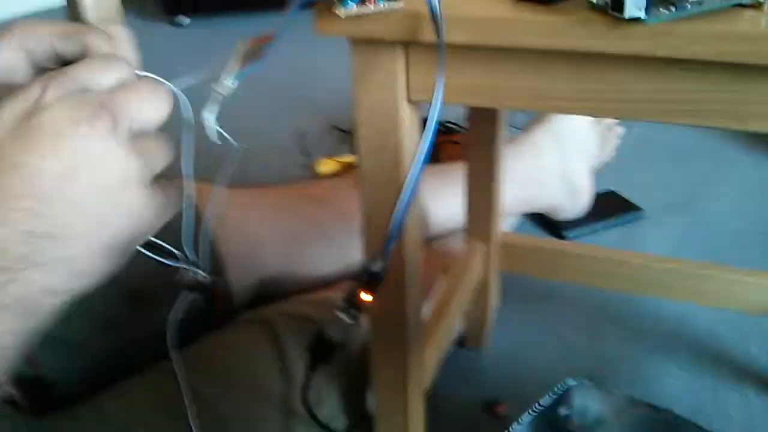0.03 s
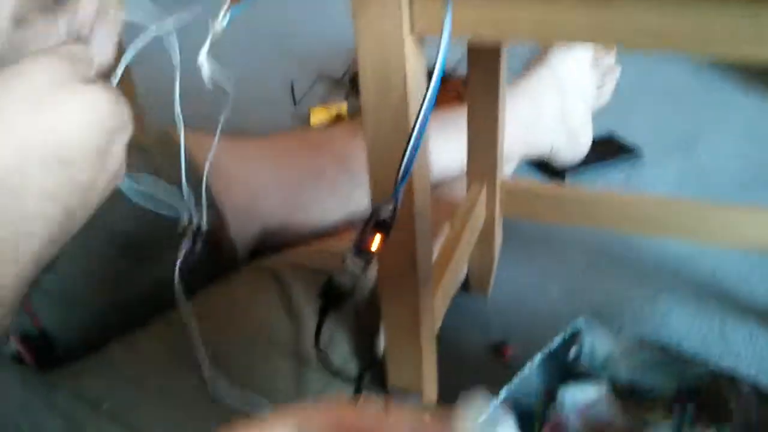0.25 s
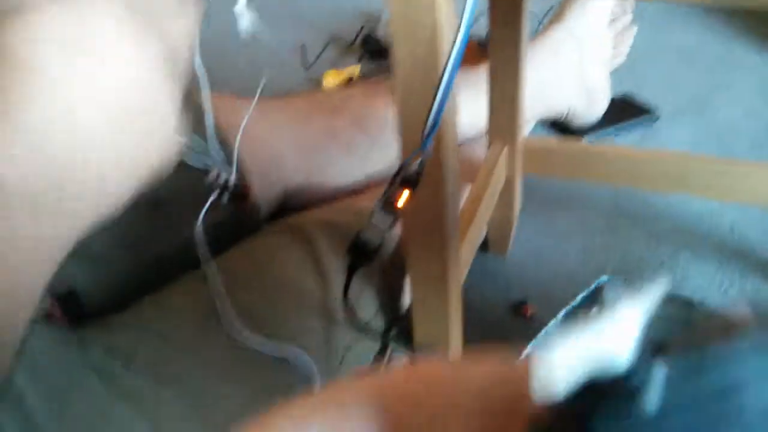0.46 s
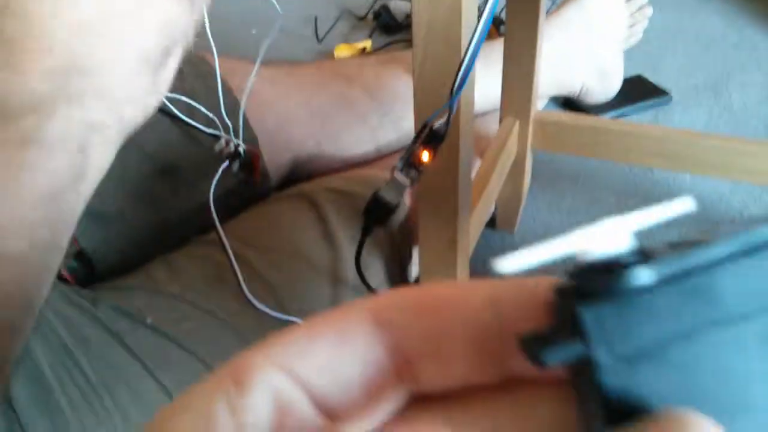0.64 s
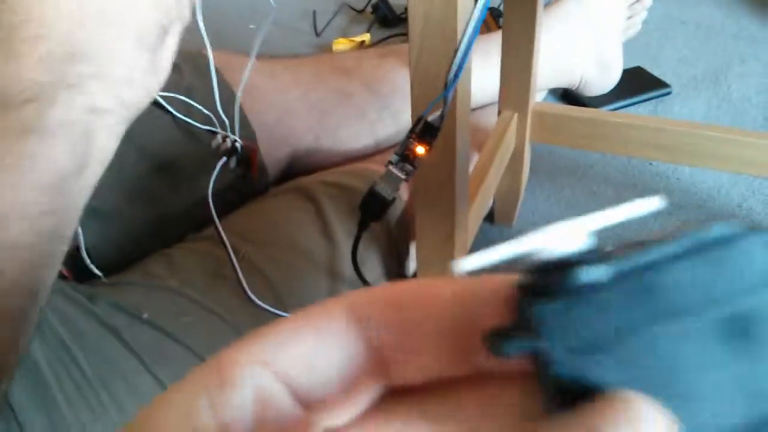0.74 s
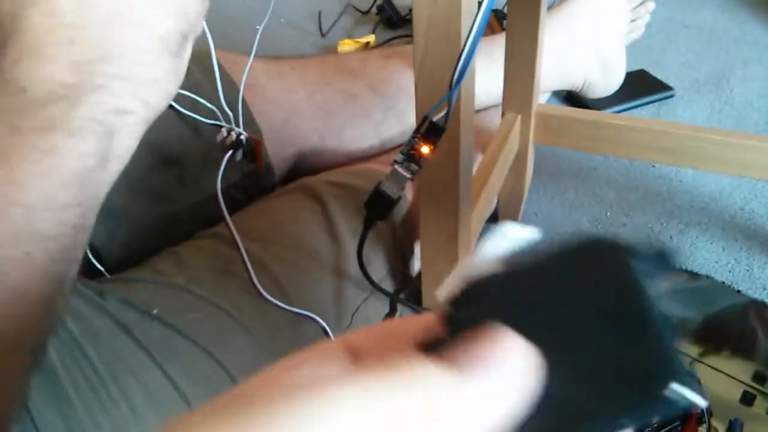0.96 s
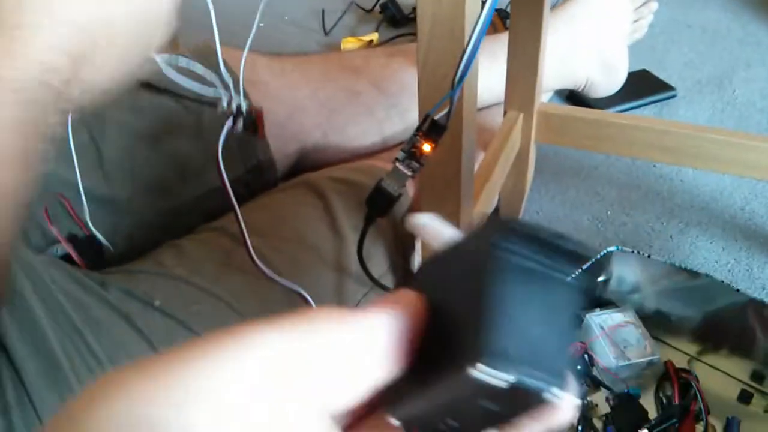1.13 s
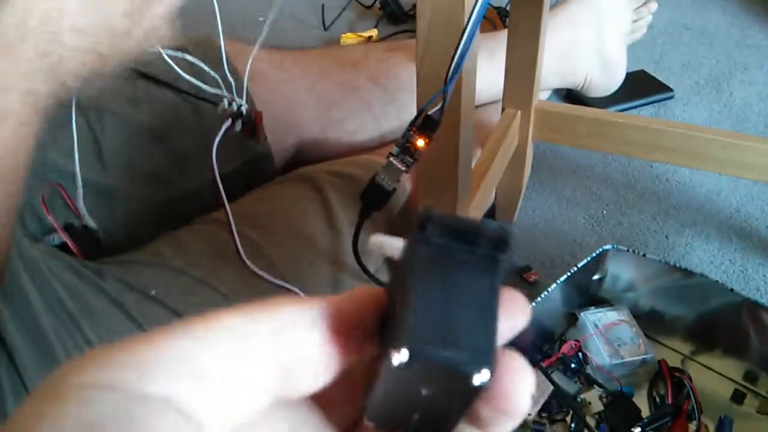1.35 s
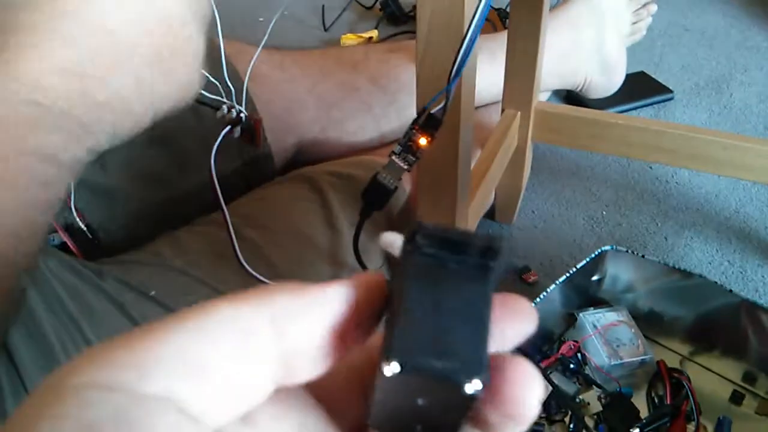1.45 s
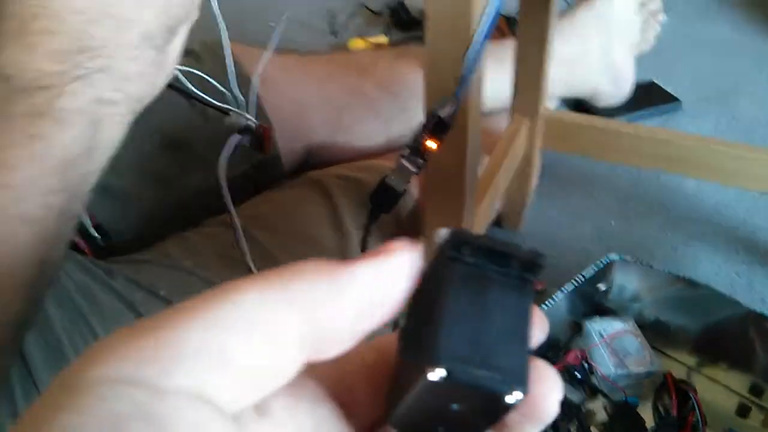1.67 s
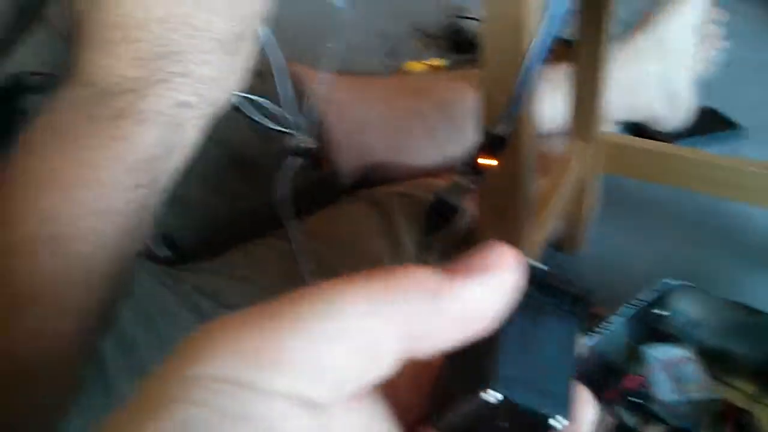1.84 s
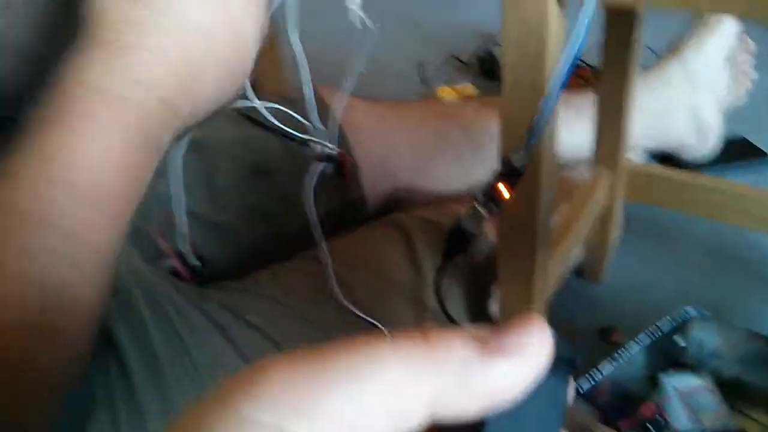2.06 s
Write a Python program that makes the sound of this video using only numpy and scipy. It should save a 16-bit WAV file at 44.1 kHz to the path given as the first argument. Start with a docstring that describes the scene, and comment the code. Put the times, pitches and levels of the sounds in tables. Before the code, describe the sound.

Close up in a quiet indoor room, a tiny geared motor buzzes with a bright, gritty hiss, stops briefly, whirs again and dies away before a crisp click; faint low hum and soft rustling lie beneath.

```python
"""A small hand-held servo whirs in three hissing bursts, close by in a quiet room.
Uneven gear-tooth impacts and sliding friction excite case resonances near 8 kHz, a rasp and a treble hiss.
Damped sine modes with falling chirps make a few sharp clicks; filtered grains make the rustle of handling.
Beneath lie spectrally shaped room noise, wavering mains lines and a low hum that comes and goes."""
import sys
import numpy as np
from scipy import signal
from scipy.fft import rfft, irfft
from scipy.io import wavfile
from scipy.ndimage import map_coordinates

SR = 44100
rng = np.random.default_rng(int(sys.argv[2]) if len(sys.argv) > 2 else 0)


def transcribe(signal):
    """Save signal, clipped to [-1, 1], as a 16-bit WAV file at the path in sys.argv[1]."""
    frames = np.atleast_2d(signal).T
    limited = np.clip(frames, -1, 1)
    pcm = np.round(limited * 32767).astype(np.int16)
    wavfile.write(sys.argv[1], SR, pcm)


N = 92610
TIME = np.arange(N) / SR  # s


def from_db(db):
    """Level as a logarithm: decibels to amplitude gain."""
    return 10 ** (np.asarray(db) / 20)


def rms_one(x):
    """Normalisation of mean power: scale to rms 1."""
    return x / np.sqrt(np.mean(x ** 2) + 1e-20)


def in_time(rows):
    """Linear interpolation of a curve in time; one array per column after the first."""
    times, *columns = np.transpose(rows)
    return [np.interp(TIME, times, column) for column in columns]


def drift(rate_hz):
    """Low-passed noise as a random wander: two equal real poles, rms 1."""
    r = np.exp(-2 * np.pi * rate_hz / SR)
    wander = signal.lfilter([1], [1, -2 * r, r * r], rng.standard_normal(2 * N))
    return rms_one(wander[N:])  # the first half lets the filter settle


def colour(x, spectrum, size=4096):
    """Minimum-phase filtering: a causal body with the given magnitude spectrum; rms 1."""
    hz, db = np.transpose(spectrum)
    grid = np.maximum(np.fft.rfftfreq(size, 1 / SR), 1)
    magnitude = from_db(np.interp(np.log(grid), np.log(hz), db))
    cepstrum = irfft(np.log(magnitude))
    causal = 2 * cepstrum * (np.arange(size) < size // 2)  # folding gives minimum phase
    response = irfft(np.exp(rfft(causal)))
    return rms_one(signal.fftconvolve(x, response)[:N])


def dying(age, t60):
    """Exponential decay of a damped mode: 60 dB in t60 seconds."""
    return from_db(-60 * age / t60)


def resonance(x, hz, width_hz):
    """Heterodyne band-pass: shift to zero, low-pass, shift back, so the centre may move; rms 1."""
    carrier = np.exp(2j * np.pi * np.cumsum(hz * np.ones(N)) / SR)
    r = np.exp(-np.pi * width_hz / SR)
    baseband = signal.lfilter([1], [1, -2 * r, r * r], x / carrier)
    return rms_one((baseband * carrier).real)


def turning(x, modes):
    """Modal superposition with gliding resonances as the servo is turned in the hand; rms 1."""
    # turn from lying flat towards upright: t/s, share/1
    turn_curve = [(.65, 0.1), (1.2, 0.78)]
    turn, = in_time(turn_curve)
    return rms_one(sum(from_db(db) * resonance(x, flat + (upright - flat) * turn, width)
                       for flat, upright, width, db in modes))


def low_hum(rough=0.45, rumble_width_hz=120):
    """Tone plus narrow-band noise: a rough hum that fades, then returns and rises in pitch."""
    # pitch and rms level of the tone: t/s, f/Hz, level/dB
    hum_curve = [(0, 90, -60), (.35, 90, -61), (.78, 88, -69), (.95, 88, -82), (1.32, 90, -80),
                 (1.39, 92, -56), (1.52, 101, -61), (1.78, 112, -62), (1.95, 113, -60), (2.0, 112, -76)]
    hz, db = in_time(hum_curve)
    tone = np.sqrt(2) * np.sin(2 * np.pi * np.cumsum(hz) / SR)
    rumble = resonance(rng.standard_normal(N), hz, rumble_width_hz)
    return from_db(db) * (tone + rough * rumble)


def mains_hum(waver_db=4.4):
    """Amplitude-modulated line spectrum: steady pitches whose levels waver at random."""
    # mains lines, rms level without the waver: f/Hz, level/dB
    mains_lines = [(59.5, -71.5), (301, -81)]
    hum = np.zeros(N)
    for hz, db in mains_lines:
        level = from_db(db + waver_db * drift(3.2))
        hum += level * np.sin(2 * np.pi * (hz * TIME + rng.random()))
    return np.sqrt(2) * hum


def room_noise(level_db=-60.5):
    """Spectrally shaped noise, with weak room resonances as narrow bands."""
    # relative spectral density of the room: f/Hz, level/dB per Hz
    room_spectrum = [(25, -6.5), (60, 2), (140, -4.5), (220, -16), (1400, -11.5), (1850, -10.5),
                     (2100, -20), (3300, -25), (4500, -17), (15000, -26.5)]
    # faint room resonances: f/Hz, width/Hz, level/dB
    room_bands = [(893, 54, -77), (1346, 160, -70.5)]
    room = from_db(level_db) * colour(rng.standard_normal(N), room_spectrum)
    drone = sum(from_db(db) * resonance(rng.standard_normal(N), hz, width) for hz, width, db in room_bands)
    return room + drone


def background():
    """Linear superposition of the low hum, the mains hum and the room noise."""
    return low_hum() + mains_hum() + room_noise()


def clicks(attack_s=0.00025):
    """Impulse response of damped modes, with a falling chirp; a soft thump swells and fades around it."""
    # sharp clicks: t/s, snap level/dB, chirp level/dB, settled chirp pitch f/Hz
    click_events = [(0.33, -25, -26.5, 4870), (0.442, -41, -30, 4980), (1.8037, -23.5, -46, 4200),
                    (1.808, -12.5, -26.5, 4040)]
    # modes relative to the snap: f/Hz, level/dB, t60/s
    snap_modes = [(7000, 4.5, 0.0031), (6600, -6.5, 0.0019), (10700, -12, 0.0028)]
    chirp_drop_hz, chirp_fall_s, chirp_t60_s = 2300, .0009, .017
    thump_hz, thump_t60_s, thump_db = 114, 0.1, -27.5  # level relative to the snap
    out = np.zeros(N)
    for s, db, chirp_db, settled_hz in click_events:
        age = np.maximum(TIME - s, 0)
        attack = np.sin(np.pi / 2 * np.minimum(age / attack_s, 1)) ** 2
        snap = sum(from_db(level) * dying(age, t60) * np.sin(2 * np.pi * hz * age)
                   for hz, level, t60 in snap_modes)
        # cycles: the integral of a pitch that falls exponentially
        turns = settled_hz * age + chirp_drop_hz * chirp_fall_s * (1 - np.exp(-age / chirp_fall_s))
        chirp = from_db(chirp_db - db) * dying(age, chirp_t60_s) * np.sin(2 * np.pi * turns)
        thump_envelope = from_db(thump_db) * dying(np.abs(TIME - s), thump_t60_s)
        thump = thump_envelope * np.sin(2 * np.pi * thump_hz * (TIME - s))
        out += from_db(db) * (attack * (snap + chirp) + thump)
    return out


def rustle(grains_per_s=6000, spread_db=1.74, low_cut_hz=4000):
    """Dry friction as random micro-impacts, filtered by resonances that glide with the turn."""
    # rustle resonances: f lying flat/Hz, f upright/Hz, width/Hz, relative level/dB
    rustle_modes = [(5360, 4840, 430, -1.5), (6100, 6300, 800, 3), (13900, 17000, 2400, -3)]
    # rms level of the rustle: t/s, level/dB
    rustle_curve = [(0, -45.5), (.255, -48), (.28, -54.5), (.315, -48), (.34, -44.5), (.46, -44),
                    (.56, -79), (1.25, -51), (1.39, -80), (1.85, -49.5), (2.1, -65.5)]
    db, = in_time(rustle_curve)
    struck = rng.random(N) < grains_per_s / SR
    grains = struck * rng.standard_normal(N) * from_db(spread_db * drift(38))
    high_pass = signal.butter(8, low_cut_hz, "high", fs=SR, output="sos")
    return from_db(db) * turning(signal.sosfilt(high_pass, grains), rustle_modes)


def hand_rubs(rub_s=0.045, width_hz=60):
    """Narrow-band noise under Gaussian envelopes: soft, dull rubs of the hand."""
    # rubs at their peaks: t/s, f/Hz, level/dB
    rub_events = [(.07, 315, -67.5), (0.229, 870, -65), (.39, 500, -69)]
    out = np.zeros(N)
    for s, hz, db in rub_events:
        envelope = np.exp(-((TIME - s) / rub_s) ** 2)
        out += from_db(db) * envelope * resonance(rng.standard_normal(N), hz, width_hz)
    return out


def tooth_contacts(jitter=.14, spread_db=3):
    """Quasi-periodic impulse train: uneven tooth ticks of random strength at the gear speed; rms 1."""
    # gear speed: t/s, tooth contacts per s/Hz
    speed_curve = [(0, 1154), (.58, 1233), (.85, 1067), (1.34, 1265), (1.4, 560), (2.1, 900)]
    rate, = in_time(speed_curve)
    teeth = np.cumsum(rate) / SR
    count = N // 10  # more than enough ticks
    marks = np.cumsum(np.exp(jitter * rng.standard_normal(count)))
    strengths = from_db(spread_db * np.clip(rng.standard_normal(count), -2, 2))
    sizes = strengths * rng.choice([-1, 1], count)
    at = np.searchsorted(teeth, marks)
    ticks = np.bincount(at, sizes, N + 1)[:N]
    return rms_one(ticks / np.sqrt(rate))  # even power at every speed


def servo(catch_t60_s=0.011, mode_width_hz=70):
    """Source-filter principle: tooth ticks and friction drive case resonances that change with the grip."""
    # the three bursts and the run-out: t/s, and before trims case ring, rasp and treble level/dB
    burst_rows = [(0.0, -49, -44.5, -56), (0.016, -47, -42, -53.5), (0.034, -46.5, -51, -57),
                  (0.252, -39, -52, -54), (0.266, -43, -47, -68), (0.274, -63, -69, -58)] + [(0.287, -52, -68, -69), (0.291, -42.5, -45, -57),
                                        (0.334, -30, -37.5, -45.5), (0.439, -26.5, -35.5, -43),
                                        (0.447, -22, -34, -41), (0.484, -29, -37, -47),
                                        (0.496, -21.5, -34, -42), (0.536, -30.5, -37, -43),
                                        (0.548, -23, -31, -45), (0.564, -24.5, -33, -39),
                                        (0.89, -31.5, -35.5, -44), (0.992, -32.5, -34.5, -41.5),
                                        (1.01, -28.5, -33, -46.5), (1.04, -34, -35, -39),
                                        (1.056, -29.5, -33.5, -42.5), (1.186, -41.5, -36.5, -44.5),
                                        (1.265, -37.5, -34.5, -42), (1.298, -42, -35.5, -42),
                                        (1.312, -34, -32, -41.5), (1.348, -32.5, -33.5, -41.5),
                                        (1.368, -62, -58, -55)] + [(1.372, -62, -54, -62),
                                                             (1.413, -45.5, -44.5, -61),
                                                             (1.418, -43, -47.5, -54),
                                                             (1.477, -29, -38, -45.5),
                                                             (1.578, -38, -39, -49), (1.702, -41, -43, -53),
                                                             (1.784, -53, -45.5, -54),
                                                             (1.798, -64, -41, -52)] + [(1.825, -49.5, -47, -52.5),
                                                                                  (1.949, -54.5, -55.5, -59),
                                                                                  (1.961, -58, -63, -60.5),
                                                                                  (2.1, -51, -57, -60)]
    # relative spectral densities of ring, rasp and treble, loosely held: f/Hz, level/dB per Hz
    ring_spectrum = [(5500, -52), (7000, -23), (7650, -3.5), (8120, 0), (8500, -1.5), (9100, -8.5),
                     (9900, -35.5), (15000, -49.5)]
    rasp_loose = [(2500, -46), (3900, -28), (4600, -51), (5400, -31.5), (6100, -7.5), (6600, -1.5),
                  (7350, 3.5), (8950, -8.5), (12000, -53.5)]
    treble_loose = [(6500, -43.5), (8500, -2), (9500, 1), (10200, 3), (11400, 2), (13000, -7), (14200, -8),
                    (15800, -8)]
    # rasp and treble with the fingers closed round the case: f/Hz, relative level/dB per Hz
    rasp_closed = [(3300, -46.5), (4300, -25.5), (5500, -20), (5930, -0.5), (6400, -10), (7300, 0),
                   (8400, -8.5), (9000, -6), (10000, -22.5)]
    treble_closed = [(6000, -44), (10000, -4), (12200, -2), (12950, -8.5), (15800, -12.5)]
    # grip: t/s, share/1
    grip_curve = [(1.18, 0.098), (1.42, 0.97)]
    # lower case resonances: f lying flat/Hz, f upright/Hz, width/Hz, relative level/dB
    low_modes = [(2710, 2970, 710, -0.5), (4286, 4750, 740, 5)]
    # their joint rms level: t/s, level/dB
    low_curve = [(.28, -63), (.34, -53.5), (.62, -52), (.95, -58), (1.15, -67), (1.38, -106), (1.46, -62),
                 (1.6, -72)]
    # narrow modes within the case ring: f/Hz, level relative to the untrimmed ring/dB
    narrow_modes = [(7780, -15), (8045, -8), (8232, -10)]
    # the gears catch as they start: t/s, level/dB
    catch_events = [(.2895, -38), (1.376, -35.5), (1.417, -34)]
    ring_db, rasp_db, treble_db = -2.5, 1, 2  # trims
    friction_db = -1.5  # relative to the ticks

    ring, rasp, treble = from_db(in_time(burst_rows))
    low, = from_db(in_time(low_curve))
    grip, = in_time(grip_curve)
    ticks = tooth_contacts()
    flutter = from_db(1.2 * drift(41))  # spread in dB, rate in Hz

    def drive():
        """Common excitation: each tooth strikes all parts at once; friction is fresh for each part."""
        return flutter * (ticks + from_db(friction_db) * rng.standard_normal(N))

    def held(loose, gripped):
        """Linear crossfade from the loosely held case to the gripped one."""
        x = drive()
        return (1 - grip) * colour(x, loose) + grip * colour(x, gripped)

    catches = sum(from_db(db) * (TIME > s) * dying(np.abs(TIME - s), catch_t60_s) for s, db in catch_events)
    case = (from_db(ring_db) * ring + catches) * colour(drive(), ring_spectrum)
    rasping = from_db(rasp_db) * rasp * held(rasp_loose, rasp_closed)
    hiss = from_db(treble_db) * treble * held(treble_loose, treble_closed)
    low_case = low * turning(drive(), low_modes)
    # random signs make the drive of each narrow mode noise-like
    narrow = sum(from_db(db) * resonance(drive() * rng.choice([-1, 1], N), hz, mode_width_hz)
                 for hz, db in narrow_modes)
    return case + rasping + hiss + low_case + ring * narrow


def reflected(x, sway_s=.00005):
    """Image sources: near surfaces add delayed copies that shift as the hand sways."""
    # echoes from hand and furniture, relative to the direct sound: delay t/s, level/dB
    echo_paths = [(.0015, -32), (.0037, -21.5), (.0062, -15)]
    out = x.copy()
    for delay, db in echo_paths:
        heard_from = (TIME - delay - sway_s * drift(1.34)) * SR
        out += from_db(db) * map_coordinates(x, [heard_from], order=3)
    return out


def scene():
    """Linear superposition: the servo in the hand with its echoes, the clicks and the room; mono."""
    in_hand = servo() + rustle() + hand_rubs()
    return (reflected(in_hand) + clicks() + background())[None]


def record(dry):
    """Band limiting: an elliptic low-pass cuts the top steeply."""
    low_pass = signal.ellip(12, .1, 80, 15720, fs=SR, output="sos")  # ripple dB, stop dB, cutoff Hz
    return signal.sosfilt(low_pass, dry)


dry = scene()
out = record(dry)
transcribe(out)
```